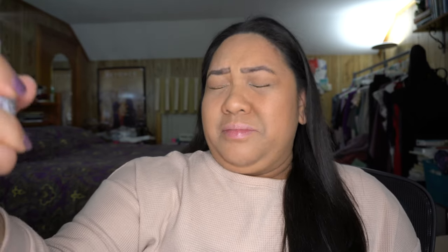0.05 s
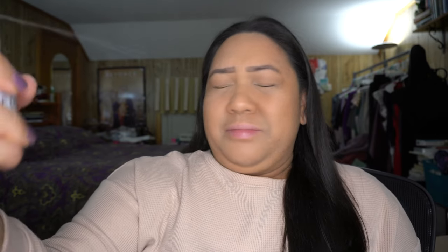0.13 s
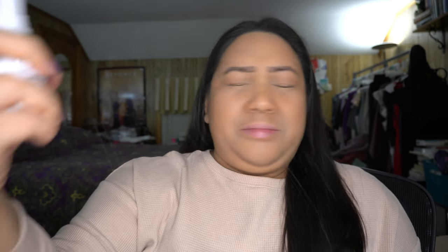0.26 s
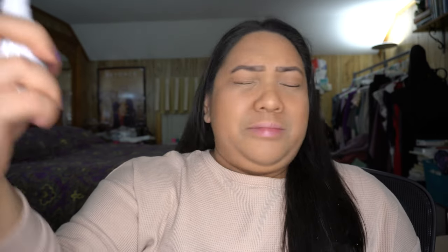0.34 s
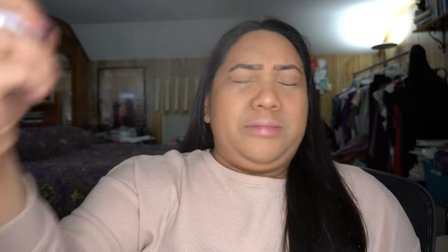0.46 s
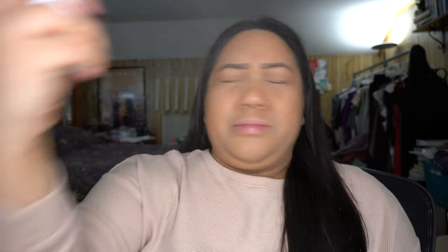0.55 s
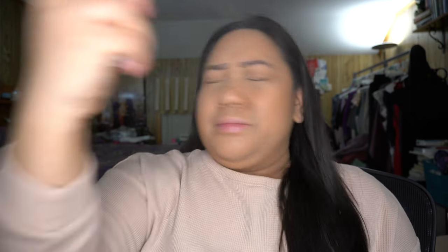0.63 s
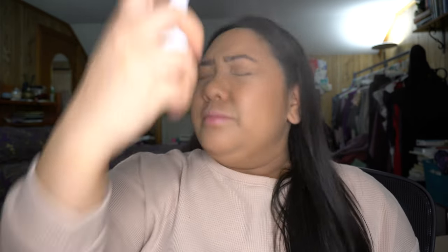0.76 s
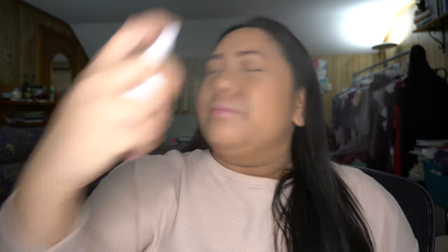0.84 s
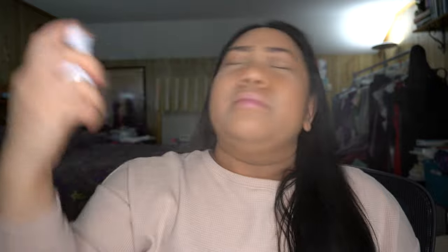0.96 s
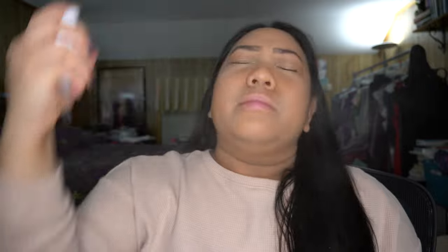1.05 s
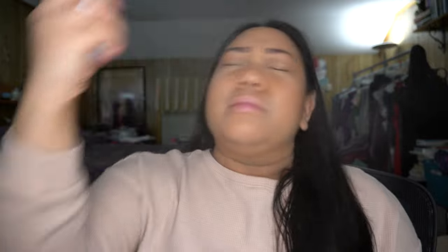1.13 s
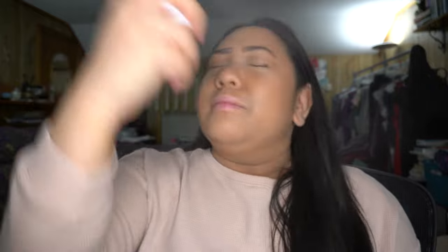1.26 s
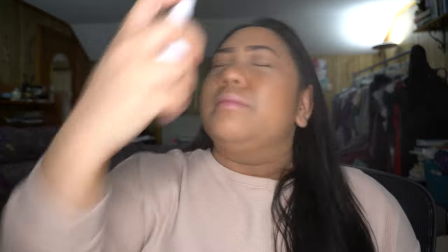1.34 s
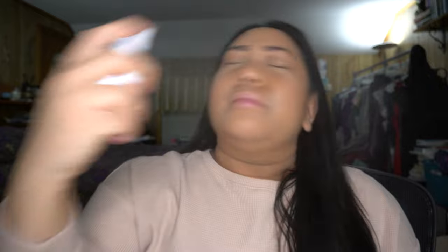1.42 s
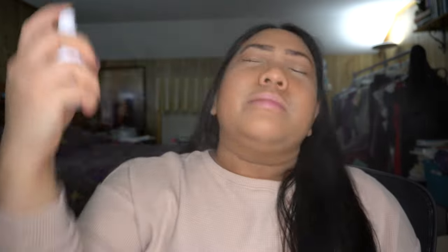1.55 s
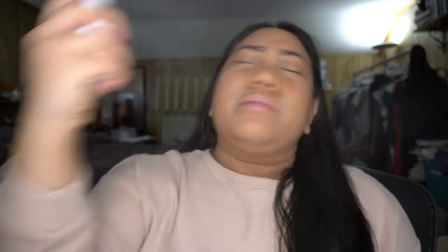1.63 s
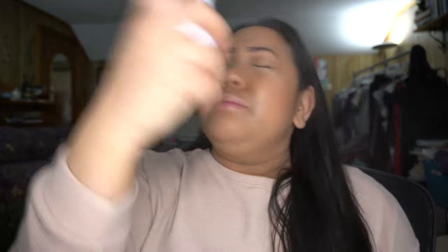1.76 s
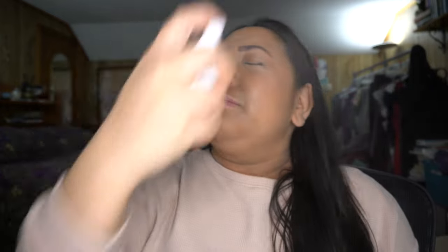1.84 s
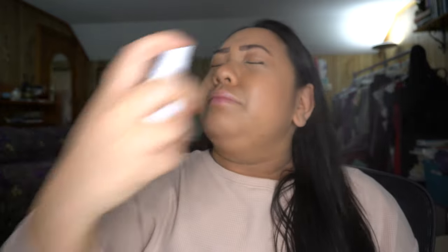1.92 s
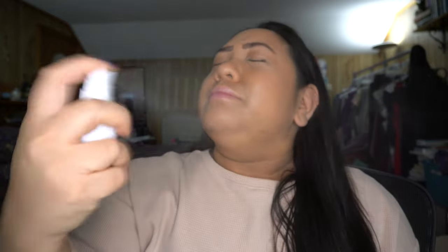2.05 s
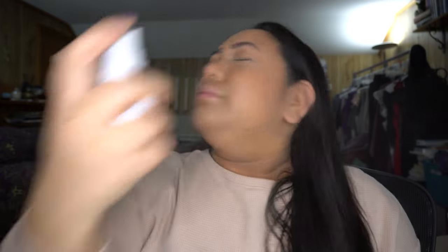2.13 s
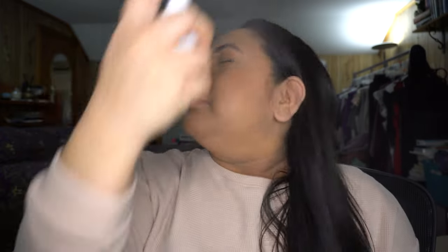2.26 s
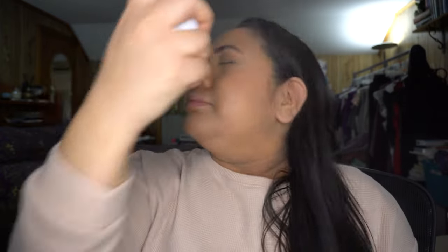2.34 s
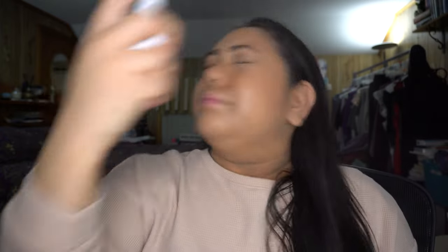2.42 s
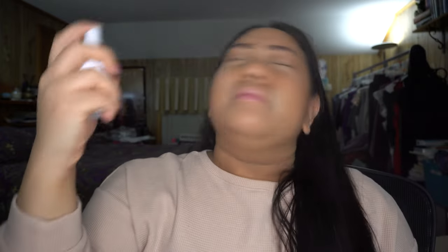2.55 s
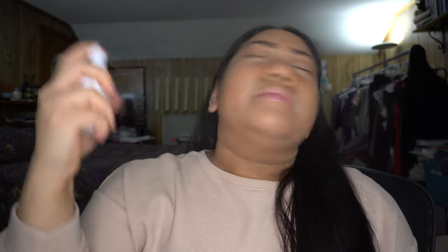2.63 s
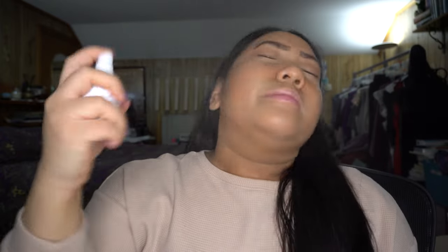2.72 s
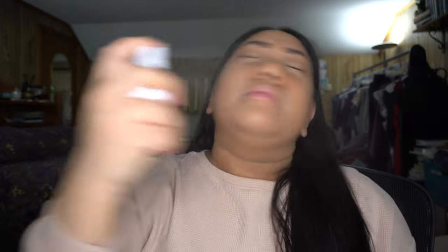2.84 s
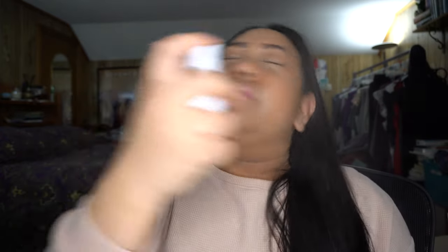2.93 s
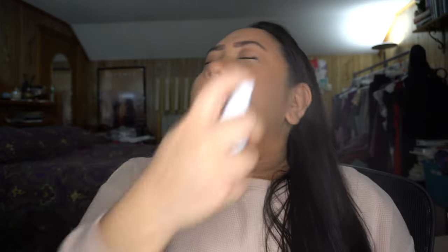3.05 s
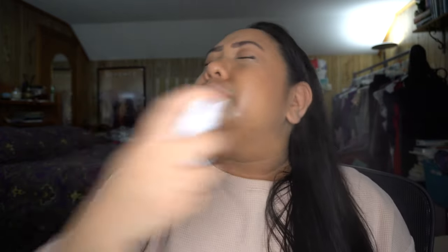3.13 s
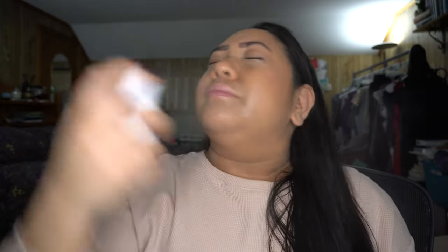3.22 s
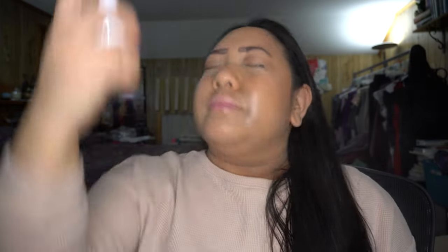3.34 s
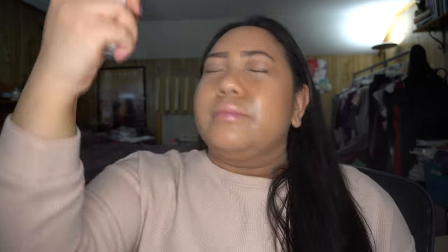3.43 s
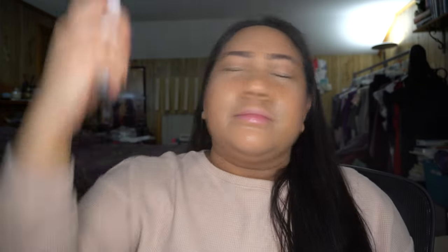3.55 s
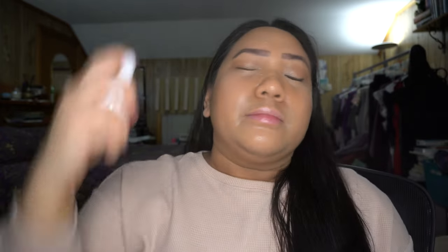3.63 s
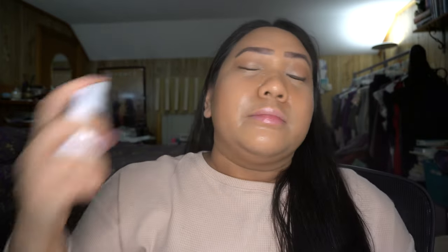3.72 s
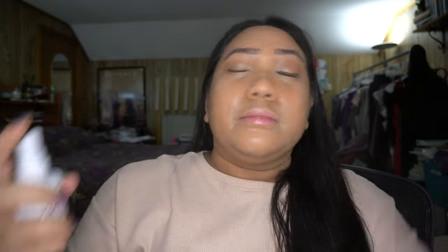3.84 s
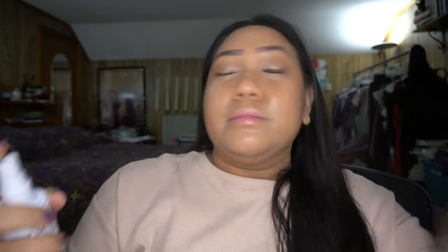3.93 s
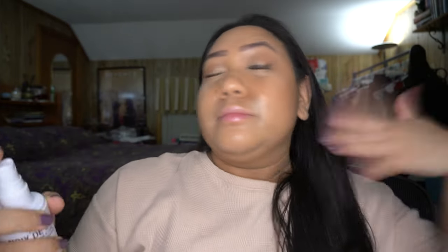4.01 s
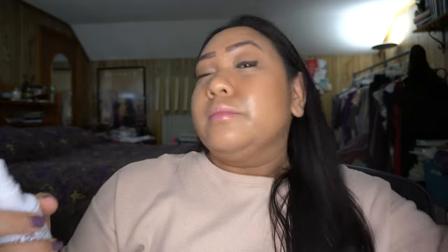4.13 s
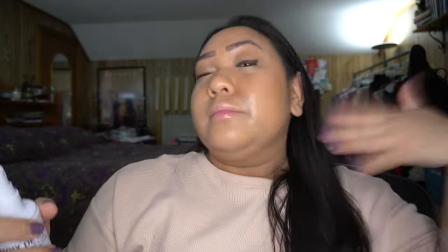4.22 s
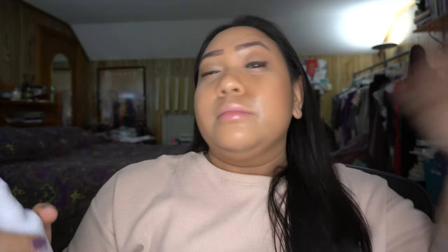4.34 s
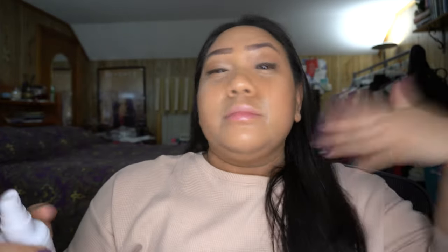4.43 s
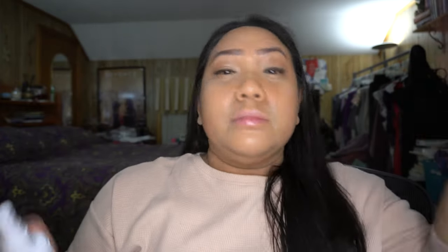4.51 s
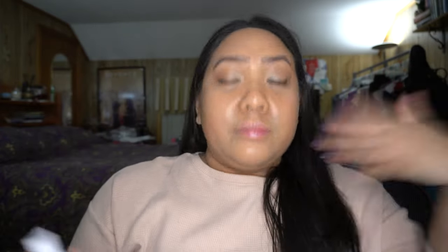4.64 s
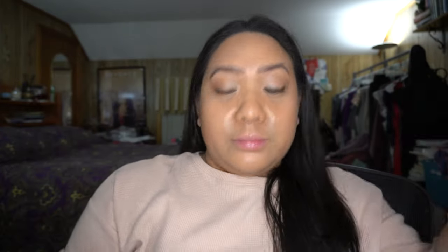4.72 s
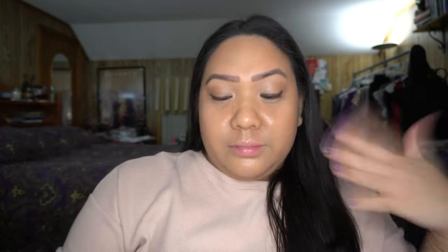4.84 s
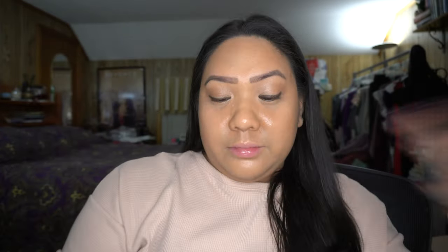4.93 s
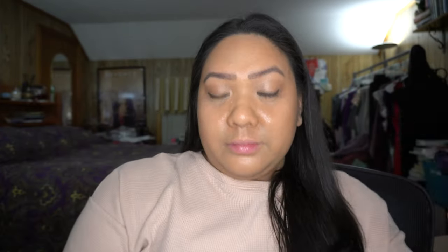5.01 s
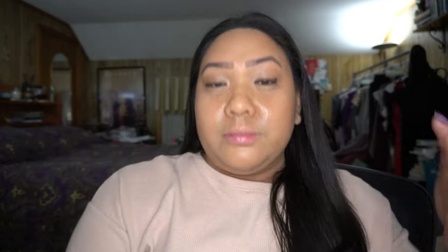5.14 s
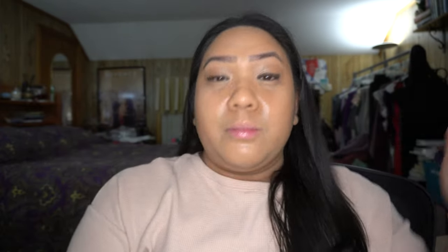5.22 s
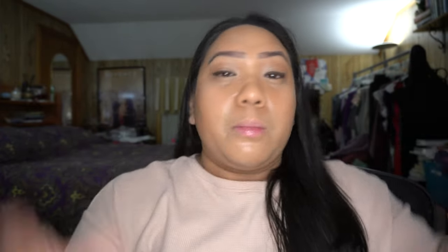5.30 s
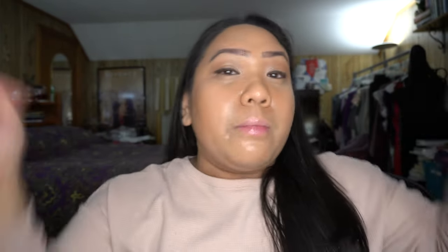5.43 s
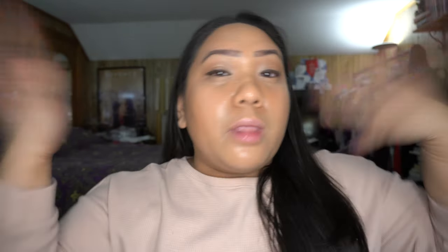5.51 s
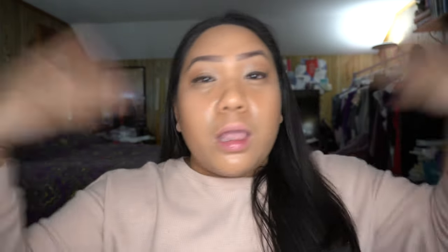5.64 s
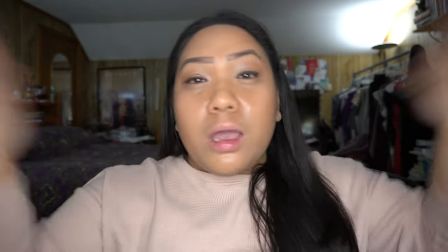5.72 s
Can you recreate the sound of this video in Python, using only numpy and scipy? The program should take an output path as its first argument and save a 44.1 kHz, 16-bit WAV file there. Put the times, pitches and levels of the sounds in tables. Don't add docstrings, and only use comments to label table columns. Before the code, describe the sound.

Close by in a furnished room, a finger pumps a small plastic spray bottle about five times a second, each airy hiss joined by light clicks, hollow knocks and faint suction. The spraying stops, quiet room tone follows, then the bottle clatters down on a wooden desk and a hard plastic part snaps sharply. Close stereo microphone, short soft reverberation.

```python
import sys
import numpy as np
from scipy import signal
from scipy.fft import rfft, irfft, next_fast_len
from scipy.io import wavfile
from scipy.ndimage import map_coordinates

SR = 44100
rng = np.random.default_rng(int(sys.argv[2]) if len(sys.argv) > 2 else 0)


def elevation(decibels):
    levels = np.asarray(decibels, float)
    return 10 ** (levels / 20)


def transcribe(u):
    v = np.clip(np.atleast_2d(u).T, -1, 1)
    q = np.round(v * 32767).astype(np.int16)
    wavfile.write(sys.argv[1], SR, q)


N = 254456

# start in seconds, length in seconds, jet level in dB, left-right difference in dB.
STROKES = [(0.073, 0.078, -39.5, 6), (0.389, 0.089, -31.5, 3.5), (0.661, 0.095, -29.5, 1),
           (0.863, 0.098, -31, 0.8), (1.058, 0.097, -31.5, 3), (1.244, 0.099, -30, -0.4),
           (1.433, 0.096, -30.5, 1.5), (1.64, 0.1, -30, 2), (1.767, 0.035, -39, -2),
           (1.841, 0.085, -30.5, -1.7), (2.028, 0.09, -31.5, 2.5), (2.248, 0.092, -30, -0.5),
           (2.475, 0.073, -33, 1.4), (2.668, 0.088, -33, 3), (2.856, 0.082, -31, 1.2),
           (3.051, 0.078, -32.5, -1.5), (3.235, 0.073, -32, 2.5), (3.444, 0.078, -31.5, 1.5),
           (3.659, 0.028, -36.5, 3)]
ARCH_DB, SAG_DB = 3, 0.05
TREBLE_DB, DRY_TREBLE_DB, DRY_SAG_DB, PRIMING_S = -6.5, 11.5, 18, 0.36
DRIBBLE_DB, DRIBBLE_S = -13, 0.0093


def spray():
    out = np.zeros((2, N))
    t = np.arange(int(0.2 * SR)) / SR
    for s, length, db, pan_db in STROKES:
        u = np.clip(t / length, 0, 1)
        dry = np.exp(-s / PRIMING_S)
        sag_db = (SAG_DB + DRY_SAG_DB * dry ** 4) * (2 * u - 1)
        level_db = db - sag_db + ARCH_DB * np.sin(np.pi * u) - 1.5
        treble_db = TREBLE_DB + DRY_TREBLE_DB * dry + rng.normal(0, 0.27)
        sputter_db = 1.24 + 0.98 * max(0, treble_db)
        jet = hiss(len(t), treble_db, sputter_db, spread=0.35)
        opening = np.clip(t / 0.0033, 0, 1) * elevation(-3 * np.exp(-t / 0.0054))
        after = np.clip(t - length + 0.0007, 0, 1)
        closing = np.maximum(elevation(-2500 * after), elevation(DRIBBLE_DB) * np.exp(-after / DRIBBLE_S))
        level = elevation(level_db + 0.18 * wobble(62, len(t)))
        add(out, s - 0.002, opening * closing * level * jet, pan_db)
    return out


# start in seconds, length in seconds, level in dB.
REFILL = [(0.164, 0.092, -53.5), (0.502, 0.11, -48.5), (0.787, 0.044, -47), (0.977, 0.056, -52),
          (1.159, 0.075, -49), (1.364, 0.043, -51), (1.547, 0.06, -48.5), (1.945, 0.059, -46),
          (2.141, 0.052, -47), (2.351, 0.034, -60), (2.375, 0.052, -46), (2.574, 0.086, -52),
          (2.759, 0.087, -49.5), (2.972, 0.047, -41), (3.144, 0.11, -58), (3.337, 0.066, -48.5),
          (3.546, 0.094, -47.5)]


def refill():
    out = np.zeros((2, N))
    for s, length, db in REFILL:
        swell = np.hanning(int(length * SR))
        flow = hiss(len(swell), treble_db=-3, sputter_db=2.5, spread=0.4)
        valve = filtered(flow, lambda f: 0.3 + resonant([(4300, 900, 0)])(f))
        add(out, s, elevation(db) * swell * valve, 1.2)
    return out


# frequency in Hz, width in Hz, level in dB.
NOZZLE = [(918, 640, -14), (1570, 306, -3.5), (2200, 510, -3.5), (3390, 700, 1), (4250, 1120, 2),
          (7170, 2160, 2), (10830, 2400, 0.5), (14950, 1000, -5.5)]
# frequency in Hz, width in Hz, depth in dB.
SHADOWS = [(5580, 530, 3.5), (9580, 810, 3.5)]


def hiss(size, treble_db, sputter_db, spread):
    mid, side = rng.standard_normal((2, size)) * elevation(sputter_db * wobble(690.0, size))
    side = filtered(side, lambda f: spread * np.clip(f / 12000, 0, 1))
    delay_s = rng.uniform(0.00014, 0.000464) + rng.uniform(-0.000059, 0.00006, (2, 1))
    aim = 1 + rng.normal(0, 0.025)

    def response(f):
        nozzle = resonant(NOZZLE)(f * aim) * elevation(treble_db * np.clip(f / 2000 - 2, 0, 1))
        shade = elevation(-sum(db * np.exp(-((f - hz) / w) ** 2) for hz, w, db in SHADOWS))
        echo = 1 + 0.19 * np.exp(-2j * np.pi * f * delay_s)
        return nozzle * shade * echo

    return unit(filtered(np.array([mid + side, mid - side]), response))


# start in seconds, peak in dB, centre in Hz.
PRESSES = [(0.3637, -28, 4300), (0.6403, -26, 3760), (0.8388, -25.5, 3140), (1.037, -24, 2600),
           (1.2235, -27.5, 4060), (1.4158, -28, 4230), (1.6246, -21, 3370), (1.8202, -20.5, 2520),
           (2.01, -28, 4160), (2.228, -24.5, 3640), (2.4453, -39, 3880), (2.6532, -29, 3530),
           (2.8265, -27.5, 2680), (3.0335, -28.5, 3540), (3.2151, -28.5, 3120), (3.4229, -28.5, 2880),
           (3.6249, -28.5, 2450)]
# start in seconds, peak in dB,
# centre in Hz, treble in dB.
TICKS = [(0.0434, -48, 3940, 2), (0.1193, -25.5, 3960, -21), (0.1284, -17, 3760, 15),
         (0.184, -40, 4310, -19), (0.2534, -31.5, 3960, -33), (0.2656, -32.5, 3300, 15),
         (0.278, -43, 4510, -28), (0.6016, -34, 3750, -27), (0.6179, -42, 3660, 3), (0.785, -45, 4240, -18),
         (1.8057, -33, 4850, -1), (1.9583, -35, 4250, -2), (1.972, -40, 4210, -11), (2.1932, -33, 3110, 5),
         (2.376, -35, 4440, -13), (2.3979, -46, 4480, -22), (2.408, -28, 4550, 7), (2.587, -36.5, 3270, -2),
         (2.6484, -29, 2800, -22), (2.818, -39, 3360, -5), (2.8332, -34, 4380, -1),
         (2.9738, -36, 3870, -13), (2.998, -30, 4270, -19), (3.012, -27.5, 4200, -18), (3.19, -37, 3700, 7),
         (4.0553, -47, 2650, -19), (5.745, -43, 2980, -20), (5.7528, -37, 3450, -22),
         (5.758, -35.5, 3170, -18)]
# start in seconds, knock in dB, click delay in seconds, click in dB, treble in dB.
RETURNS = [(0.034, -33, 0.0036, -28.5, -12), (0.219, -33.5, 0.022, -31, -17),
           (0.572, -36, .018, -23.5, -21), (1.595, -39.5, 0.0037, -25, -24), (2.175, -32, 0.0065, -20.5, 6),
           (2.413, -43, 0.0029, -28, 1), (2.617, -41, 0.0036, -25, 3), (3.006, -41, .001, -27.5, -18),
           (3.378, -32.5, 0.0064, -25.5, 1), (3.6, -51, 0.0062, -30, 0), (3.77, -44.5, 0.0032, -35.5, 2)]
PRESS_TREBLE_DB, RETURN_HZ, RETURN_LEFT_DB = 0, 3470, 3.5


def ticks():
    out, size = np.zeros((2, N)), int(0.08 * SR)
    starts, _, _, pans = np.transpose(STROKES)
    rows = [(s, db, hz, PRESS_TREBLE_DB, 1.2) for s, db, hz in PRESSES]
    rows += [(*row, 0) for row in TICKS]
    rows += [(s + lag, db, RETURN_HZ, treble_db, RETURN_LEFT_DB) for s, _, lag, db, treble_db in RETURNS]
    for s, db, hz, treble_db, left_db in rows:
        head = [(hz, 1600, 0), (7800, 3000, treble_db - 6.5), (11500, 4000, treble_db - 7.0)]
        pan_db = left_db + 1.18 * np.interp(s, starts, pans, right=0)
        add(out, s, elevation(db - 2.05) * struck(head, 0.013, size), pan_db)
    return out


# start in seconds, peak in dB.
BOTTOMS = [(0.757, -30.5), (0.961, -26.5), (1.15, -29.5), (1.34, -26.5), (1.528, -30), (1.735, -30.5),
           (1.926, -36), (2.116, -29), (2.342, -33), (2.546, -47), (2.938, -38.5)]
# start in seconds, peak in dB, ring in Hz.
KNOCKS = [
    (0.076, -34, 700),
    (0.408, -38, 706),
    (0.537, -44, 670),
    (1.621, -38, 720),
    (2.578, -39, 440),
]
PRESS_KNOCK_DB = -16.5
PRESS_RING_HZ, TOP_RING_HZ, BOTTOM_RING_HZ = 700, 672, 720


def knocks():
    out, size = np.zeros((2, N)), int(0.08 * SR)
    rows = [(s, db, BOTTOM_RING_HZ) for s, db in BOTTOMS]
    rows += [(row[0], row[1], TOP_RING_HZ) for row in RETURNS]
    rows += [(s - 0.002, db + PRESS_KNOCK_DB, PRESS_RING_HZ) for s, db, _ in PRESSES]
    rows += KNOCKS
    for s, db, hz in rows:
        hollow = [(hz * (1 + rng.normal(0, 0.014)), 140, 0), (960, 350, -8 + rng.normal(0, 6.3))]
        add(out, s, elevation(db + 1.0) * pushed(hollow, 0.00036, size), 0.6)
    return out


# start in seconds, peak in dB, edge level in dB, bottle share from 0 to 1.
LANDING = [(5.065, -29.5, -19, 0.66), (5.092, -18, -4, 0.78), (5.115, -12.5, -10, 0.27),
           (5.1221, -11.5, -36, 0.49), (5.135, -18, -37, 0.07), (5.146, -37, -29, 0.7),
           (5.162, -21.5, -9.5, 0.48), (5.169, -24, -15, .1), (5.197, -20.5, -25, 0.35),
           (5.221, -24, -22, 0.36), (5.252, -34, -26, 0.1), (5.273, -38, -26, 0.06)]
# frequency in Hz, width in Hz, level in dB.
DESK = [(124.6, 31, -2), (181.6, 13.4, 4), (279, 44, 0.5), (437, 35, 0.5), (493, 20, -1), (520, 36, 0.5),
        (720, 89, -6), (1110, 130, -14.5), (1410, 270, -29), (2100, 230, -31)]
BOTTLE = [(538, 80, 9), (700, 67, 10.5), (930, 150, -4), (1530, 790, -23)]
EDGE = [(1260, 350, 6), (1790, 510, 5), (2880, 530, 3.5), (3840, 590, -1), (6300, 3000, -18)]


def landing():
    out, size = np.zeros((2, N)), int(0.2 * SR)
    for s, db, edge_db, share in LANDING:
        share = np.clip(share, 0, 1)
        rim = [(hz, w, level - 14 * share * (hz < 3000)) for hz, w, level in EDGE]
        body = (1 - share) * pushed(DESK, 0.00021, size) + share * pushed(BOTTLE, 0.00011, size)
        add(out, s, elevation(db) * (body + elevation(edge_db) * struck(rim, 0.019, size)), -0.3)
    return out


# time in seconds, level in dB, edge level in dB.
ROCKING = [
    (5.11, -29, -19),
    (5.118, -14.5, -17.5),
    (5.141, -30.5, -34),
    (5.176, -53, -2),
    (5.218, -36.5, -22),
    (5.33, -77, -20),
]


def rocking():
    out = np.zeros((2, N))
    s, db, edge_db = np.transpose(ROCKING)
    t = s[0] + np.arange(int((s[-1] - s[0]) * SR)) / SR
    bumps = rng.standard_normal(len(t)) * elevation(4.0 * wobble(251.3, len(t)))
    body = unit(filtered(bumps, resonant(DESK))) * elevation(np.interp(t, s, db) - 1.0)
    rim = unit(filtered(bumps, resonant(EDGE))) * elevation(np.interp(t, s, db + edge_db) + 4.0)
    add(out, s[0], (body + rim) * np.clip((t - s[0]) / 0.019, 0, 1), -0.3)
    return out


# start in seconds, peak in dB, body level in dB.
SNAP = [
    (5.6501, -9, -42),
    (5.6513, -10, -37),
    (5.6502, -16, -28),
    (5.6545, -17, -16),
    (5.6564, -17.5, -19),
    (5.6579, -13, -15),
    (5.6626, -26, -13),
    (5.668, -36, 3),
]
# frequency in Hz, width in Hz, level in dB.
PART = [(410, 92, -19.5), (890, 660, -28), (1430, 320, -9.5), (2570, 150, -3.5), (3080, 240, -6.5),
        (3360, 370, -10), (4340, 440, -1.5), (7080, 380, -7.5), (9850, 520, -6.5), (13900, 1900, -29)]


def snap():
    out, size = np.zeros((2, N)), int(0.1 * SR)
    for s, db, body_db in SNAP:
        add(out, s, elevation(db - 1.5) * struck(PART[2:], 0.007, size), -0.8)
        add(out, s, elevation(db + body_db + 3.0) * struck(PART[:2], 0.014, size), -0.8)
    return out


def room(x):
    out, step = np.zeros((2, N + SR)), SR // 5
    for i in range(0, N, step):
        answer = signal.fftconvolve(x.mean(0)[None, i:i + step], echo_tail(), axes=1)
        out[:, i + 150:][:, :answer.shape[1]] += answer
    return out[:, :N]


# frequency in Hz, 60 dB decay time in seconds.
ROOM = [(200, 0.31), (2000, 0.29), (6000, 0.16), (14000, 0.15)]


def echo_tail():
    hz, t, z = signal.stft(rng.standard_normal((2, SR // 2)), SR, nperseg=256)
    apart = np.clip(hz / 3000, 0.2, 1)[:, None]
    z = np.array([z[0] + apart * z[1], z[0] - apart * z[1]]) / np.sqrt(1 + apart ** 2)
    decay = elevation(-60 * t / along(ROOM, hz)[:, None])
    tail = signal.istft(z * decay, SR, nperseg=256)[1]
    return tail / np.linalg.norm(tail[0])


# frequency in Hz, density in dB per Hz.
AIR = [(15, -33), (25, 0.5), (229, -8), (300, -13), (607, -14.5), (988, -18), (2160, -23), (16000, -36)]
# time in seconds, level in dB.
AIR_DB = [(0.0, -51.5), (2.17, -51), (4.06, -53.5), (5.09, -54), (5.3, -49.5), (5.77, -54.5)]
# frequency in Hz, correlation from -1 to 1.
ALIKE = [(60, 1), (180, 0.71), (550, -0.22), (1650, -0.0041), (4970, 0.033), (15000, 0.37)]


def air():
    turn = lambda hz: np.arccos(np.clip(along(ALIKE, hz), -1, 1)) / 2
    mid, side = filtered(rng.standard_normal((2, N)),
                         lambda hz: elevation(along(AIR, hz)) * [np.cos(turn(hz)), np.sin(turn(hz))])
    s, db = np.transpose(AIR_DB)
    level_db = np.interp(np.arange(N) / SR, s, db) + 0.6 * wobble(4.7, N)
    return elevation(level_db) * unit(np.array([mid + side, mid - side]))


def struck(peaks, t60, size):
    crack = rng.standard_normal(size) * elevation(-60 * np.arange(size) / SR / t60)
    ring = filtered(crack, resonant(peaks))
    return ring / np.abs(ring).max()


def pushed(peaks, soft_s, size):
    push = np.pad(np.hanning(int(soft_s * SR) + 3), (0, size))[:size]
    scatter_db = rng.normal(0, 1.5, len(peaks))
    modes = [(hz, w, db + d) for (hz, w, db), d in zip(peaks, scatter_db)]
    ring = filtered(push, resonant(modes))
    return ring / np.abs(ring).max()


def resonant(peaks):
    return lambda f: sum((-1) ** k * elevation(db) * 1j * f * w / (c * c - f * f + 1j * f * w)
                         for k, (c, w, db) in enumerate(peaks))


def filtered(x, response):
    m = next_fast_len(x.shape[-1] + 8192)
    return irfft(rfft(x, m) * response(np.fft.rfftfreq(m, 1 / SR)), m)[..., :x.shape[-1]]


def add(out, s, sound, pan_db=0):
    sides = np.array([[0.5], [-0.5]])
    lead_s = 0.000008 * pan_db * sides
    padded = np.pad(sound * np.ones((2, 1)), ((0, 0), (8, 0)))
    pair = filtered(padded, lambda f: np.exp(2j * np.pi * f * lead_s))
    part = out[:, round(s * SR) - 8:][:, :pair.shape[1]]
    part += (pair * elevation(sides * pan_db))[:, :part.shape[1]]


def wobble(rate, size):
    return map_coordinates(rng.standard_normal(int(size * rate / SR) + 4), [np.arange(size) * rate / SR])


def along(points, hz):
    f, v = np.transpose(points)
    return np.interp(np.log(hz + 1), np.log(f + 1), v)


def unit(x):
    return x / np.sqrt(np.mean(x ** 2) + 1e-20)


def scene():
    jet, head, bottle = spray() + refill(), ticks(), knocks()
    thud, click = landing() + rocking(), snap()
    wet = elevation(-10.5) * jet + elevation(-6.0) * head + elevation(-9.5) * bottle
    wet += elevation(-6.5) * thud + elevation(-14) * click
    return jet + head + bottle + thud + click + room(wet) + air()


def band_limit(x):
    return signal.sosfilt(signal.butter(12, 17000, fs=SR, output="sos"), x)


def record(dry):
    low_hz, top_hz = 45, 15800
    band = lambda hz: hz ** 2 / (hz ** 2 + low_hz ** 2) * np.where(hz < top_hz, 1, elevation(-27))
    return band_limit(filtered(dry, band))


dry = scene()
out = record(dry)
transcribe(out)
```